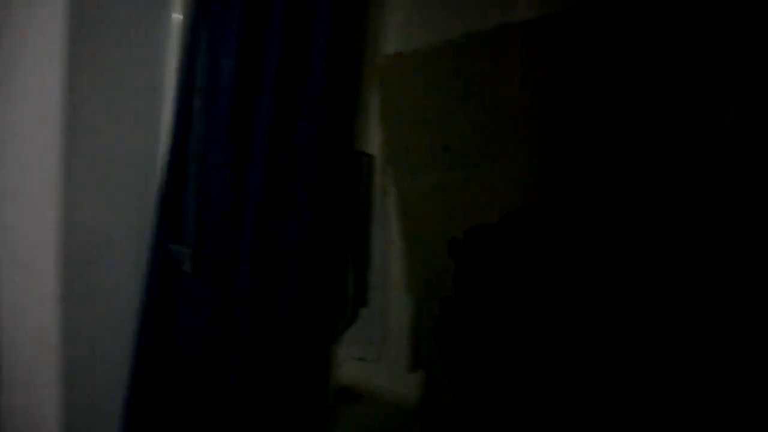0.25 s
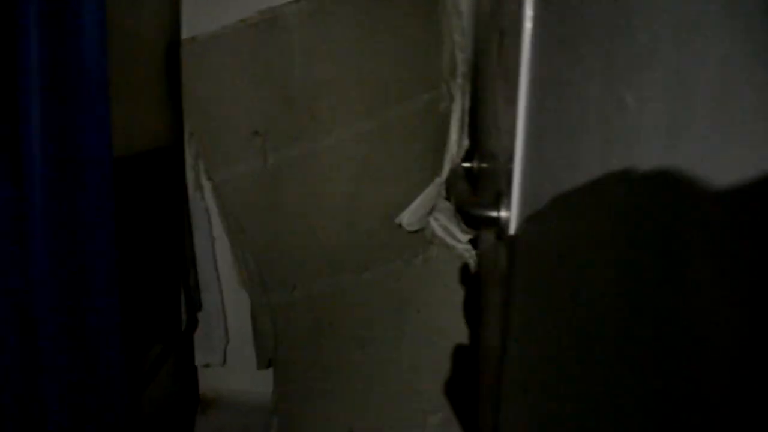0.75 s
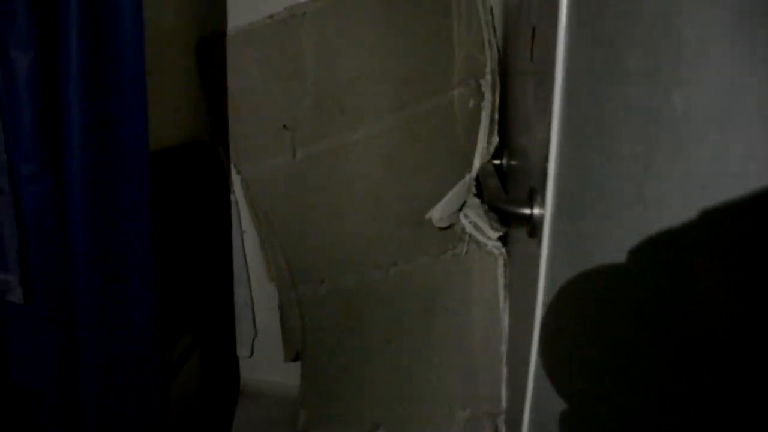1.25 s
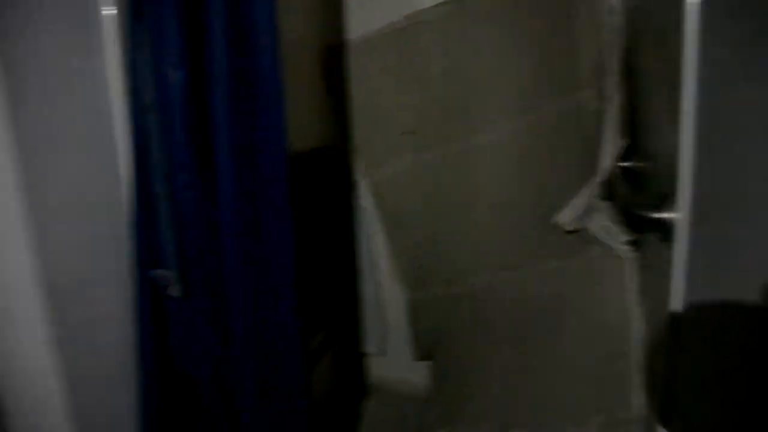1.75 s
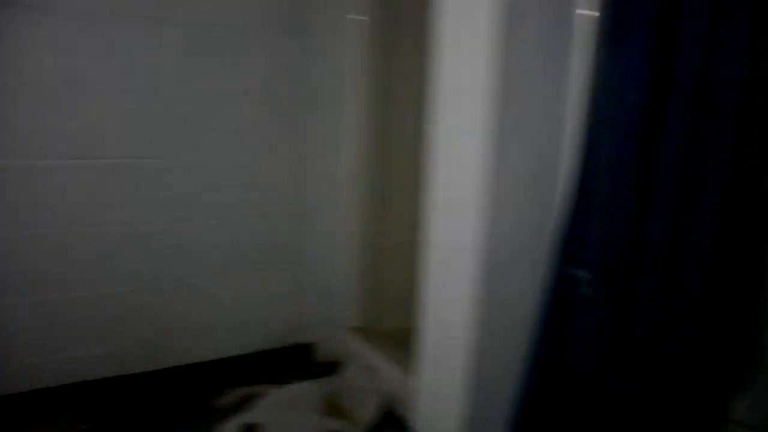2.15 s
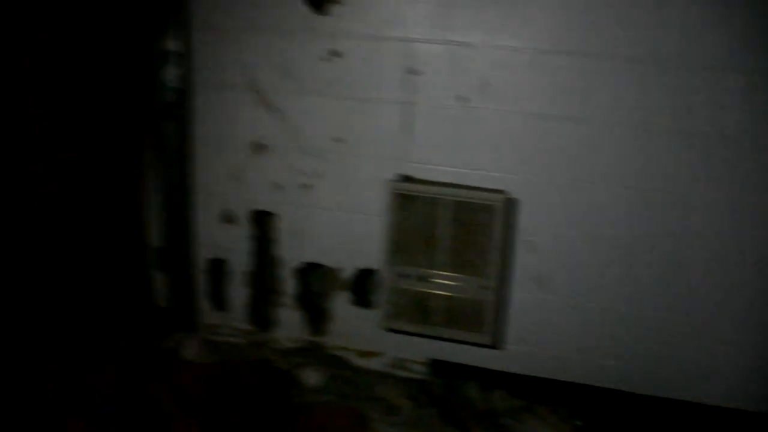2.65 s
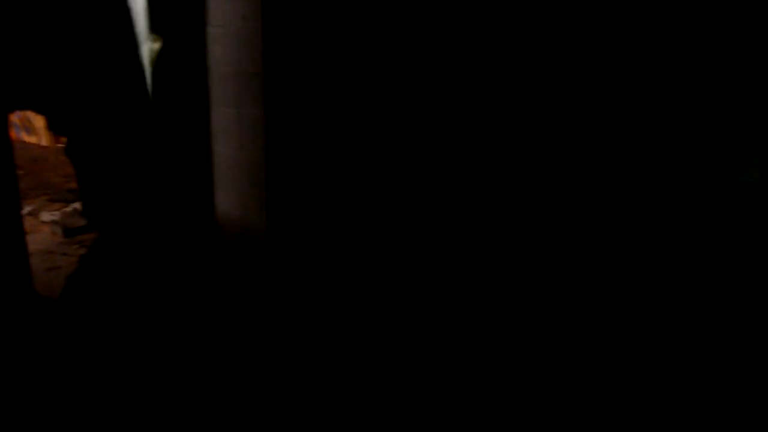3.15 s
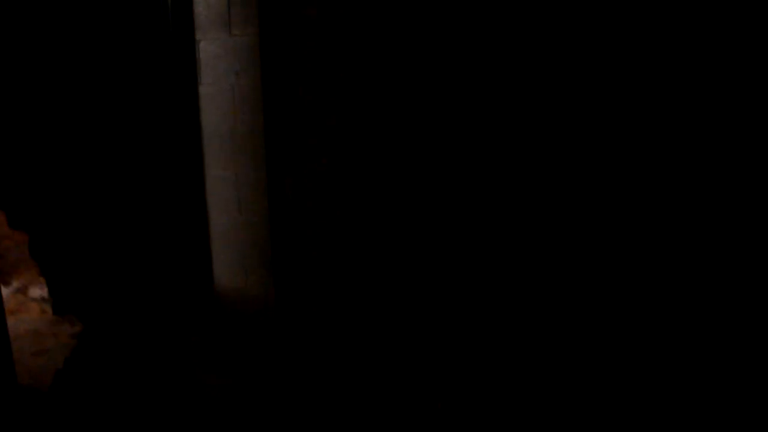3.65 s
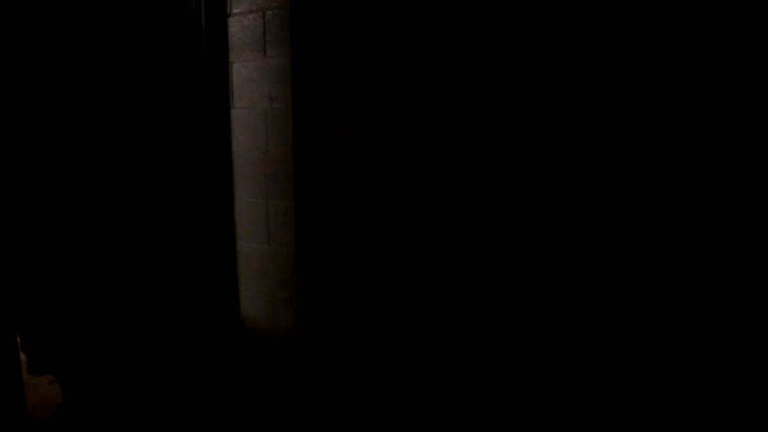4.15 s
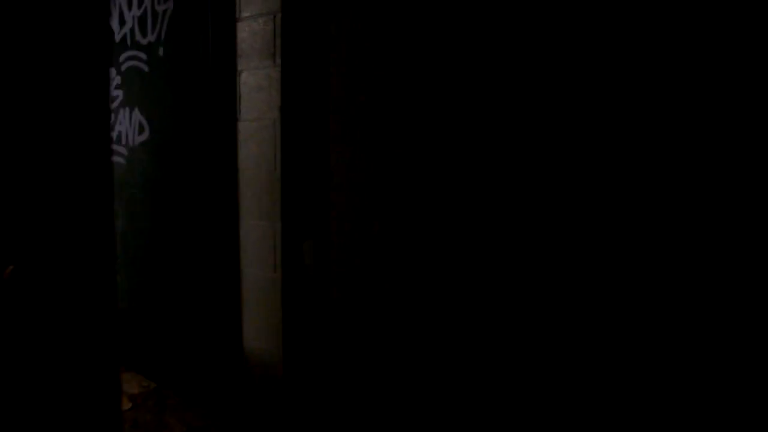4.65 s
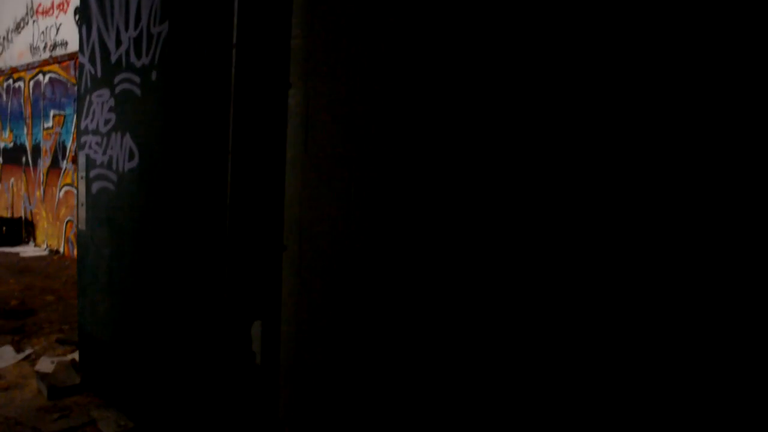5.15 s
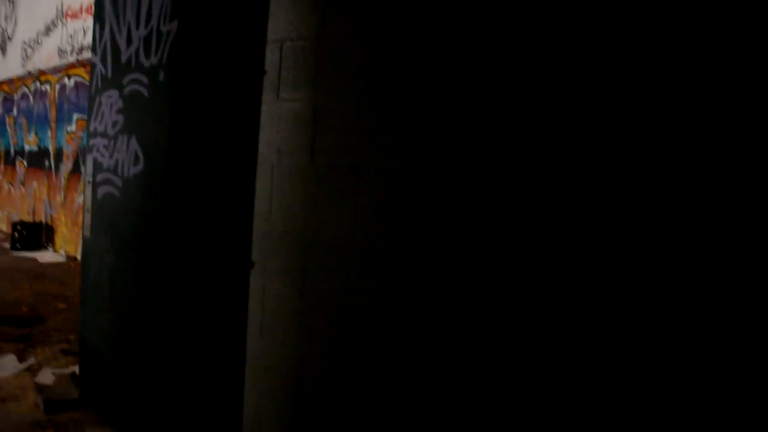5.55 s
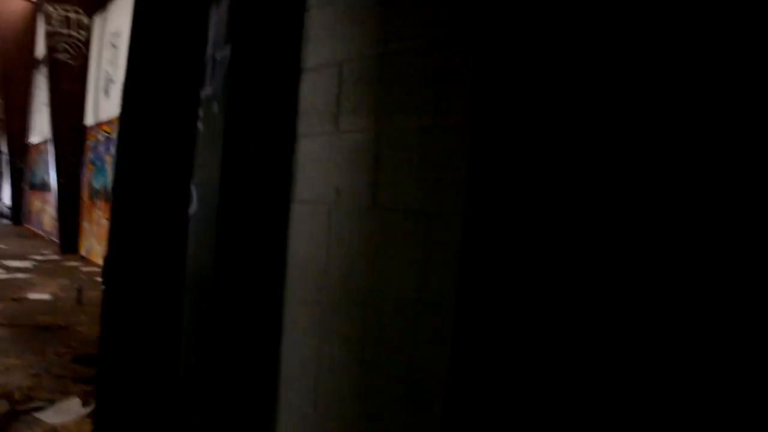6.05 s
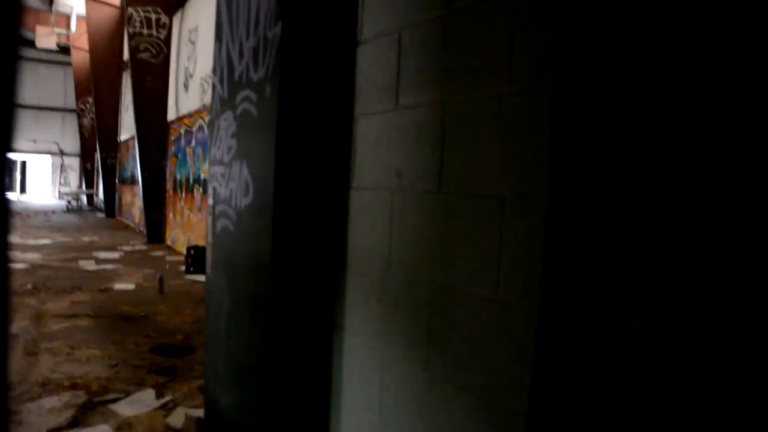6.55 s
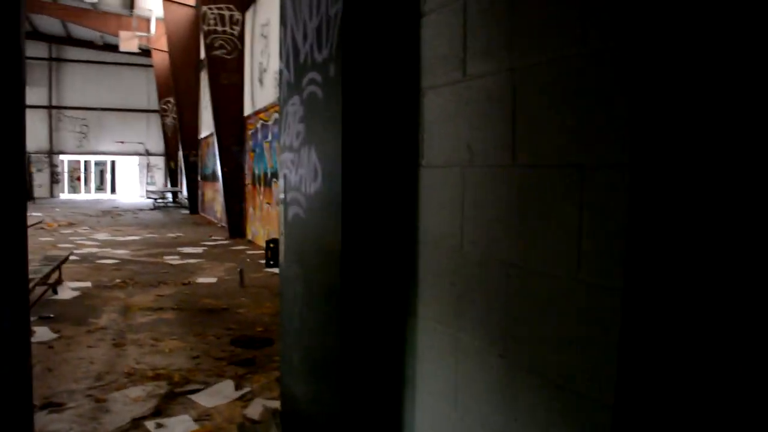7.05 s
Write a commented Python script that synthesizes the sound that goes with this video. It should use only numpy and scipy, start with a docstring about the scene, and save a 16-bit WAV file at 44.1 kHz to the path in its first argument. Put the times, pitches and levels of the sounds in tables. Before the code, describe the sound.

Close stereo pickup carried by a walker in a bare, derelict room. Quiet at first: small dry ticks, light crunches, short scuffs and faint clinks. One very sharp snap breaks out past two seconds, then a brief metallic jingle. Later steps thud hollowly on loose boards, and gritty scraping and crackling grow much louder, with short bright echoes.

```python
"""A bare, hard-walled room: someone walks over plaster, grit and shards, carrying two close microphone ports.
Cracks and ticks are noise bursts with a sharp onset; scraping grit is a dense train of random grains in bands.
Heels on loose boards, knocked chunks and metal bits on a strap are sums of decaying modes.
The walls answer with short, bright, diffuse tails of filtered noise; still air lies beneath as shaped noise,
with a hollow murmur early on."""
import sys
import numpy as np
from scipy import signal
from scipy.fft import rfft, irfft
from scipy.io import wavfile
from scipy.ndimage import uniform_filter1d

SR = 44100
rng = np.random.default_rng(int(sys.argv[2]) if len(sys.argv) > 2 else 0)


def materialize(psi):
    """Save the field psi as 16-bit PCM at rate SR to the path in sys.argv[1].

    A 1-D psi becomes a single channel; in a 2-D psi each row is a channel.
    """
    bounded = np.clip(np.atleast_2d(psi).T, -1, 1)
    quanta = np.round(bounded * 32767).astype(np.int16)
    wavfile.write(sys.argv[1], SR, quanta)


N = 322371
T = np.arange(N) / SR

# Levels in the tables are relative: the mix in scene() scales most of them again.
# Spectrum of the still air. Each row: frequency in Hz, relative density in dB per Hz.
AIR_SPECTRUM = [(15, -67), (25, -43), (59, -20), (82, -14.5), (178, -15), (246, -15.5), (267, -16),
                (1300, -15), (8810, -25.5), (13200, -23.5), (15500, -24)]
AIR_RMS_DB = -63.5
# Hollow murmur in the air. Each row: time in seconds, rms level in dB.
MURMUR_LEVELS = [(0, -63), (.7, -66), (1.3, -64), (1.5, -68), (1.7, -80)]
MURMUR_HZ, MURMUR_WIDTH_HZ = 460, 110

# Bands of the room tail. Each row: low edge in Hz, high edge in Hz.
ROOM_BANDS_HZ = [(140, 450), (450, 1150), (1150, 2400), (2400, 6000), (6000, 16500)]
# Decay time of each room band: seconds to fall by 60 dB.
ROOM_DECAYS_S = [0.23, 0.42, 0.42, 0.36, 0.27]
# Relative level of each room band, in dB.
ROOM_LEVELS_DB = [0.13, 0.58, 1, 0, 0.87]

# Modes of the metal bits: frequency in Hz.
METAL_MODES_HZ = [2498, 2560, 3518, 4280, 5155, 6065, 6995, 8980, 9490, 10270, 11190, 12280, 12990, 15390]
# The same modes in order. Each row: relative level in dB, decay time (60 dB) in seconds.
METAL_MODES = [(1.5, .14), (-6, .13), (0, .17), (0, .15), (0, .18), (0, .15), (-3, .13), (-3, .13),
               (-5, .12), (-5, .13), (-5, .13), (-9, .13), (-9, .13), (-7, .13)]
# Clinks of the metal. Each row: start in seconds, level in dB, pitch struck hardest in Hz, spread in octaves.
METAL_CLINKS = [(.301, -66, 5156, .12), (.331, -68, 5156, .11), (.376, -52, 5156, 0.092),
                (.411, -61, 5156, .11), (1.916, -51.5, 4140, .12), (1.926, -52, 3519, .11),
                (1.932, -58, 6300, .2), (1.94, -61, 9250, 0.1), (1.951, -43, 2970, 0.38),
                (1.976, -62, 5156, .14), (2.041, -58, 4360, 0.21), (2.108, -65, 5051, .16),
                (2.196, -57.5, 4470, 0.16), (3.626, -39, 3519, .11), (3.66, -47, 3520, .1),
                (3.698, -29.5, 2500, 0.11), (3.706, -35, 3519, 0.13), (3.711, -48, 6501, 0.53),
                (3.716, -55, 11001, .5), (3.736, -51, 5031, .34), (3.751, -58, 4701, 0.24),
                (3.776, -59, 3519, 0.13), (3.821, -56, 5156, .12), (4.012, -50.5, 4200, .23),
                (4.015, -59, 8981, .06), (4.023, -55, 12991, .06), (4.041, -62, 7001, 0.12),
                (4.097, -49, 2561, .14), (4.101, -57, 3519, .09), (4.1455, -53, 4300, .3),
                (4.151, -53, 8200, 0.29), (4.176, -56, 9101, .11), (4.191, -59, 4450, .21),
                (4.196, -51, 2520, 0.16)]
STRAY_DB = -31.5  # every clink also rings the modes far from the struck pitch

# Heels on loose boards. Each row: start in seconds, level in dB, pitch in Hz, decay time (60 dB) in seconds.
HEEL_THUDS = [(2.205, -54, 176, .11), (4.331, -23.5, 284, 0.076), (4.472, -51, 280, .11),
              (4.537, -39.5, 282, 0.22), (4.631, -39, 318, .049), (4.805, -36, 305, 0.063),
              (5.776, -29, 428, 0.17), (6.286, -32, 285, 0.14), (6.967, -31, 217, 0.097),
              (7.295, -22.5, 347, 0.094)]
# Chunks of plaster and wood knocked aside. Each row: start in seconds, level in dB, pitch in Hz,
# decay time (60 dB) in seconds.
CHUNK_KNOCKS = [(.068, -40.5, 820, 0.089), (2.195, -54, 1177, 0.04), (2.539, -39, 1530, 0.024),
                (3.033, -45, 1210, 0.059), (3.037, -42.5, 617, .041), (3.477, -42, 1600, .023),
                (3.501, -41.5, 1080, 0.025), (3.586, -38, 640, 0.018), (3.852, -39, 1500, 0.044),
                (3.938, -33.5, 733, 0.031), (4.085, -39, 681, 0.033), (4.192, -36, 720, .03),
                (4.373, -33, 1391, 0.03), (4.697, -29.5, 790, 0.028), (5.055, -33, 1140, 0.046),
                (5.059, -34.5, 856, 0.08), (6.525, -30.5, 667, 0.035), (6.528, -31, 1600, .041)]

# Narrow bands that colour cracks and grit: centres in octaves above 1 kHz, then edges in Hz.
BAND_OCT = np.log2(np.geomspace(164, 14075, 15) / 1000)
BAND_STEP_OCT = BAND_OCT[1] - BAND_OCT[0]
BAND_EDGES_HZ = 1000 * 2 ** (BAND_OCT[:, None] + BAND_STEP_OCT * np.array([-.5, .5]))
BASS_STEEPER = 1.484  # colour falls this much faster below its brightest place than above
SKIRT_DB = -43  # colour never falls further than this below its brightest place

# In the next four tables the brightest place is in octaves above 1 kHz; narrowness is the dB lost
# one octave above it, its sign ignored.
# Debris shifting under the walker's weight. Each row: time in seconds, level in dB, brightest place.
DEBRIS_SHUFFLE = [(0, -76, 2.1), (.6, -63, 0.8), (1.6, -83, .8), (1.87, -76, 0.58), (2.5, -56, 1.57),
                  (3, -58, 0.52), (3.46, -61, 0.19), (3.65, -47.5, 0.24), (4.3, -49, 0.1),
                  (5.05, -48.5, 0.8), (5.598, -64.5, 0.22), (5.72, -44, 0.4), (6.4, -44, 0.67),
                  (6.94, -60.5, 0.82), (7, -37, 0.29), (7.31, -40, 0.79)]
SHUFFLE_NARROW_DB = 1
# Soles scuffing over grit. Each row: time of the peak in seconds, rise over 20 dB in seconds,
# fall over 20 dB in seconds, level in dB, brightest place, narrowness in dB.
SOLE_SCUFFS = [(0.01, 0.053, 0.054, -44, 0.06, 4), (.085, .016, 0.075, -49, 0.9, -4),
               (.49, 0.081, 0.1, -45, 3.5, 2), (0.978, 0.01, 0.058, -26, 1.9, 3.5),
               (1.24, .05, 0.099, -62, 3, -1), (1.33, 0.034, .1, -61.5, 2.5, 0.3),
               (1.949, 0.07, 0.34, -47.5, 0.95, 2.1), (2.354, .008, 0.11, -32, 2, 2),
               (2.79, 0.22, 0.12, -51, 0.1, 1.1), (3.09, 0.077, 0.27, -44, 2.2, 0.7),
               (3.34, 0.035, 0.046, -47, 9, 2.1), (3.6, 0.067, 0.24, -55, 3, 7),
               (3.698, 0.014, 0.032, -27.5, -0.13, 2.5), (3.86, 0.025, 0.054, -47, 6, 7),
               (4.339, .04, 0.11, -35, -0.93, 2), (4.46, 0.12, 0.11, -46, 1, 0.5),
               (4.72, .1, .12, -38.5, .6, 0.7), (5.07, 0.017, 0.034, -58, -2, 13.5),
               (5.288, 0.22, 0.22, -35.5, 0.44, 1.3), (5.4, 0.048, .1, -39, 0.4, 2),
               (5.702, 0.022, 0.28, -30.5, 3, 0.3), (5.791, 0.046, 0.18, -21, 2, 0.66),
               (5.88, 0.15, 0.36, -30, 3, 1), (6.052, 0.045, 0.17, -28.5, 2.1, 1),
               (6.17, 0.087, 0.02, -28, 3.5, 8), (6.236, 0.027, 0.15, -28.5, 0.3, 1.5),
               (6.292, 0.066, 0.13, -27.5, 0.4, 1), (6.37, 0.092, 0.057, -30.5, 4, 1.2),
               (6.492, 0.0067, 0.017, -44.5, 1, 2.1), (6.545, .03, 0.13, -35, 0.43, 5),
               (6.965, 0.0076, 0.037, -47, 1.5, 12.5), (6.99, 0.016, 0.092, -31, -2, -11),
               (7.25, 0.21, 0.042, -40, 1.2, 0.2)]
# Dry ticks close to the ports. Each row: start in seconds, level in dB, brightest place, narrowness in dB.
CLOSE_TICKS = [(.1322, -30.5, 0.85, 2), (.256, -41, 0.8, 11), (.336, -39.5, 0.6, 17), (.47, -43, 2, 0),
               (.789, -26, 1.17, 3), (1.921, -42, -0.4, 6), (1.97, -42, -0.5, 9), (2.269, -45.5, 2, 1),
               (3.2075, -36, 1.5, 0.5), (3.475, -48, -2.5, 7), (3.5, -37.5, -1, 13), (4.085, -28, -2, 4),
               (4.373, -40, 1.5, 4), (6.033, -25, 1.3, 1), (6.227, -13.5, 0.37, 4)]
# Cracks underfoot. Each row: start in seconds, level in dB, brightest place, narrowness in dB.
FOOT_CRACKS = [(.0672, -31.5, 2.04, 3.5), (.398, -39.5, 1.7, 1), (.469, -41, 2, 0.5), (.82, -44, 1.5, 3),
               (.897, -41.5, 1.75, 1.6), (.966, -22.5, 0.8, 3), (1.213, -48, 4, 0.5),
               (1.311, -43.5, 2.8, 1.8), (1.437, -53.5, 3.5, .6), (1.921, -41, -1, 1.5),
               (2.031, -48.5, 3, 6), (2.195, -54, 2.5, -3), (2.3457, -10.5, 1.73, 22), (2.3485, -19, 3, 12),
               (2.538, -42, 2, 5), (3.035, -37, 0.06, 6), (3.324, -38.5, 2.5, 1.5),
               (3.585, -33.5, -0.45, 3), (3.695, -36, -3, 5), (3.85, -42, 2.5, -0.6), (3.937, -51, 1, 7),
               (4.084, -37.5, -1, -3.5), (4.192, -45, 2.5, 8), (4.372, -39, 3, 1.5),
               (4.439, -34.5, .6, 2.5), (4.634, -32.5, -0.8, 1.5), (4.697, -34, 3.9, 0.5),
               (5.054, -27.5, -0.18, 9.5), (5.19, -38.5, 2, 0.3), (5.735, -18.5, .9, 2),
               (5.777, -11, 2.1, 2.5), (5.919, -26, 2.7, 1.5), (6.033, -24.5, 0.7, 7),
               (6.146, -19.5, 4, 0.96), (6.259, -22, 1.6, 3.5), (6.491, -32, 3, 1), (6.526, -36, 1.2, 1.5),
               (6.741, -40, 1.05, 1.5), (6.969, -28, 0.5, 1.2)]
CRACK_CRUMBLE_S, TICK_CRUMBLE_S = 0.0015, 0.0021

PORTS_HZ = 9200  # corner above which the two ports differ most
BASS_HZ = 140  # corner below which the steps weaken
TOP_HZ = 15900


def undb(db):
    """Amplitude ratio from its logarithm in decibels."""
    return 10 ** (np.asarray(db) / 20)


def unit(x):
    """Normalisation to an rms of one."""
    return x / np.sqrt(np.mean(x ** 2))


def band(x, low_hz, high_hz, order=2):
    """Band limiting by a maximally flat filter."""
    return signal.sosfilt(signal.butter(order, [low_hz, high_hz], "bandpass", fs=SR, output="sos"), x)


def add(out, s, x):
    """Superposition: mixes x into out from time s on."""
    i = int(s * SR)
    x = x[..., :out.shape[-1] - i]
    out[..., i:i + x.shape[-1]] += x


def ring(hz, t60, size):
    """Damped oscillation: one mode that loses 60 dB in t60 seconds."""
    t = np.arange(size) / SR
    return np.sin(2 * np.pi * hz * t) * 1000. ** (-t / t60)


def air():
    """Stationary noise: random spectra shaped into still air, plus a band of noise for the murmur."""
    bin_hz = np.maximum(np.arange(N // 2 + 1) * SR / N, 1)
    table_hz, table_db = np.transpose(AIR_SPECTRUM)
    gain = undb(np.interp(np.log(bin_hz), np.log(table_hz), table_db))
    still = irfft(rfft(rng.standard_normal((2, N))) * gain, N)
    still = still / np.sqrt(np.mean(still[0] ** 2)) * undb(AIR_RMS_DB)
    half_hz = MURMUR_WIDTH_HZ / 2
    hollow = band(rng.standard_normal(N), MURMUR_HZ - half_hz, MURMUR_HZ + half_hz, order=1)
    murmur_db = np.interp(T, *np.transpose(MURMUR_LEVELS), right=-120)
    still[0] += unit(hollow) * undb(murmur_db)
    return still


def walls(x, gap_s=0.0011, hop=16384):
    """Diffuse reverberation: two unrelated noise tails, each band dying at its own pace.

    As the walker moves the pattern of reflections changes: every hop a fresh pair crossfades in."""
    t, out = np.arange(22000) / SR, np.zeros((2, N + 2 * hop))
    x = np.pad(x, (hop, 2 * hop))
    fade = np.sin(np.pi * np.arange(2 * hop) / (2 * hop))  # overlapping halves keep the power constant
    for i in range(0, N + hop, hop):
        noise = rng.standard_normal((len(ROOM_BANDS_HZ), 2, len(t)))
        tail = 0
        for n, hz, t60, db in zip(noise, ROOM_BANDS_HZ, ROOM_DECAYS_S, ROOM_LEVELS_DB):
            tail = tail + undb(db) * band(n, *hz) * 1000. ** (-t / t60)
        tail = tail * (1 - np.exp(-t / gap_s)) * undb(-23)  # reflections build up after the direct sound
        add(out, (i + .5) / SR, signal.fftconvolve(x[None, i:i + 2 * hop] * fade, tail, axes=1))
    return out[:, hop:hop + N]


def clinks(chatter_s=0.0041, flicker_db=4.5):
    """Modal excitation: a knock drives the modes near its pitch; bits chatter and brush, so the ring flickers."""
    out, t = np.zeros(N), np.arange(12000) / SR
    modes = np.array([undb(db) * ring(hz, t60, size=len(t))
                      for hz, (db, t60) in zip(METAL_MODES_HZ, METAL_MODES)])
    modes = modes * (1 - np.exp(-t / chatter_s))  # chattering softens the onset
    chance = rng.standard_normal((len(METAL_CLINKS), len(METAL_MODES), 32))
    for (s, db, hz, spread), c in zip(METAL_CLINKS, chance):
        away = np.log2(np.array(METAL_MODES_HZ) / hz) / spread
        struck = np.sign(c[:, 0]) * (np.exp(-.5 * away ** 2) + undb(STRAY_DB))
        flicker = uniform_filter1d(np.repeat(c[:, 1:], 400, axis=1), size=400)[:, :len(t)]
        add(out, s, undb(db) * struck @ (modes * undb(flicker_db * flicker)))
    return out


def thuds(table, overtone, overtone_db):
    """Free vibration after impact: the first mode of the struck piece and a quicker overtone."""
    out = np.zeros(N)
    for s, db, hz, t60 in table:
        first = ring(hz, t60, size=8192)
        second = undb(overtone_db) * ring(overtone * hz, 0.45 * t60, size=8192)
        add(out, s, undb(db) * (first + second))
    return out


def colour(octave, narrow_db):
    """Spectral envelope: dB per band, a parabola falling away from the brightest place."""
    away = np.subtract.outer(BAND_OCT, octave)
    steepness = np.abs(narrow_db) * np.where(away < 0, BASS_STEEPER, 1)
    return np.maximum(-steepness * away ** 2, SKIRT_DB)


def pressure():
    """Addition of powers: the shuffle and every swelling and fading scuff set the amplitude of each grit band."""
    s, db, octave = np.transpose(DEBRIS_SHUFFLE)
    shuffle_colour = colour(np.interp(T, s, octave), SHUFFLE_NARROW_DB)
    power = undb(np.interp(T, s, db) + shuffle_colour) ** 2
    for s, rise_s, fall_s, db, octave, narrow_db in SOLE_SCUFFS:
        near = slice(max(int((s - 3 * rise_s) * SR), 0), int((s + 3 * fall_s) * SR))
        swell_db = -20 * np.maximum((s - T[near]) / rise_s, (T[near] - s) / fall_s)
        power[:, near] += undb(db + swell_db + colour(octave, narrow_db)[:, None]) ** 2
    return np.sqrt(power)


def grit(per_s=6000., scatter_db=1.27, patchy_db=2.5):
    """Granular friction: dense tiny impacts of uneven size, two unrelated trains, each band patchy in time."""
    struck = rng.random((2, N)) < per_s / SR
    grains = struck * rng.standard_normal((2, N)) * undb(scatter_db * rng.exponential(size=(2, N)))
    patches = rng.standard_normal((len(BAND_EDGES_HZ), N))
    patches = uniform_filter1d(uniform_filter1d(patches, size=700), size=700)
    patches = unit(uniform_filter1d(patches, size=4, axis=0, mode="wrap"))  # neighbours share their patches
    out = 0
    for gain, patch, hz in zip(pressure(), patches, BAND_EDGES_HZ):
        out = out + unit(band(grains, *hz, order=3)) * gain * undb(patchy_db * patch)
    return out * np.sqrt(BAND_STEP_OCT)  # table levels are per octave


def blend(parts):
    """Subband synthesis: filters one signal per band and sums them."""
    return sum(band(x, *hz, order=3) for x, hz in zip(parts, BAND_EDGES_HZ))


def cracks(table, crumble_s):
    """Brittle fracture: an impulsive snap, then a fast-decaying noise burst as the piece crumbles."""
    out, t = np.zeros((len(BAND_EDGES_HZ), N)), np.arange(2048) / SR
    chance = rng.standard_normal((len(table), 2, len(t)))
    # low octaves pass less of a click, so they are lifted by the root of their pitch
    lift = np.sqrt(SR / 2 / (1000 * 2 ** BAND_OCT))
    fade = np.exp(-t / crumble_s)
    for (s, db, octave, narrow_db), (noise, uneven) in zip(table, chance):
        burst = unit(noise * undb(2.5 * uneven) * fade) * np.sqrt(np.mean(fade ** 2)) * .15
        burst[0] = 3.  # the snap outweighs the crumbs
        band_gain = lift * undb(db + colour(octave, narrow_db))
        add(out, s, burst * band_gain[:, None])
    return blend(out)


def scene():
    """Superposition of direct, reflected and ambient sound, as mid and side of two close ports."""
    crack, tick = cracks(FOOT_CRACKS, CRACK_CRUMBLE_S), cracks(CLOSE_TICKS, TICK_CRUMBLE_S)
    rub, rub_other = grit()
    heel, chunk, metal = thuds(HEEL_THUDS, 1.86, -7), thuds(CHUNK_KNOCKS, 1.8, -4), clinks()
    direct = undb(1.0) * crack + undb(3.0) * tick + heel + undb(3.5) * metal + undb(3) * chunk
    to_walls = undb(5.5) * crack + undb(-21) * tick + undb(-19) * rub
    to_walls = to_walls + undb(-11.0) * heel + undb(-12) * metal + undb(-5.0) * chunk
    tail_mid, tail_other = walls(to_walls)
    still_mid, still_other = air()
    # close ports differ mostly in the treble: by all that comes from around and by the slant of the direct sound
    around = tail_other + still_other + undb(-6.0) * rub_other
    side = signal.lfilter(*signal.butter(1, PORTS_HZ, "highpass", fs=SR), 0.98 * around + 0.47 * direct)
    side = side + undb(-13) * still_other  # each port's own hiss
    # the steps, the grit and their echoes thin out below the bass corner
    steps = tail_mid + direct + undb(-5) * rub
    steps = signal.sosfilt(signal.butter(2, BASS_HZ, "highpass", fs=SR, output="sos"), steps)
    return np.array([steps + still_mid + side, steps + still_mid - side])


def record(dry):
    """Band limiting: a steep lowpass cuts the top of the treble."""
    return signal.sosfilt(signal.ellip(12, .2, 90, TOP_HZ, fs=SR, output="sos"), dry)


dry = scene()
out = record(dry)
materialize(out)
```